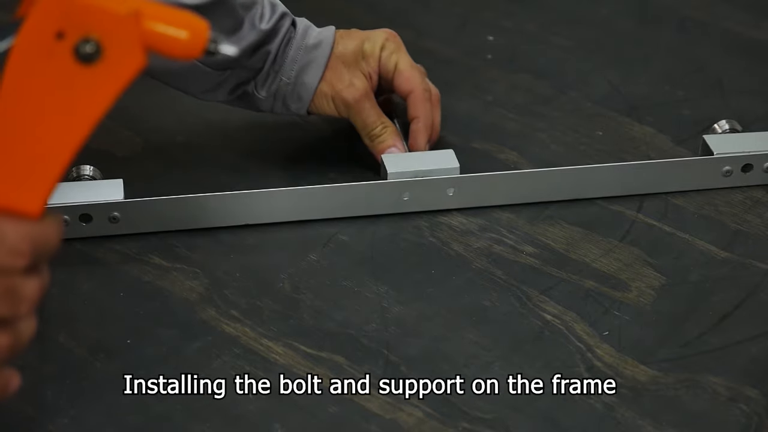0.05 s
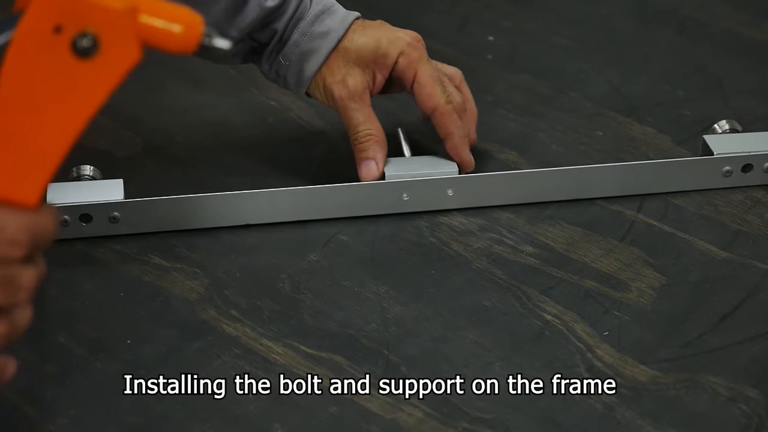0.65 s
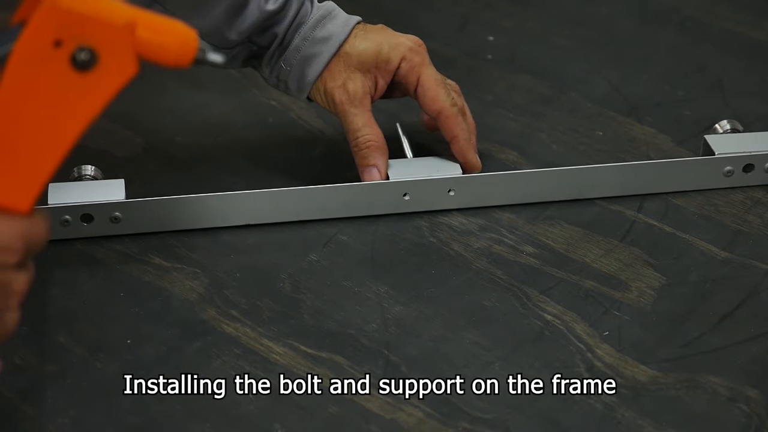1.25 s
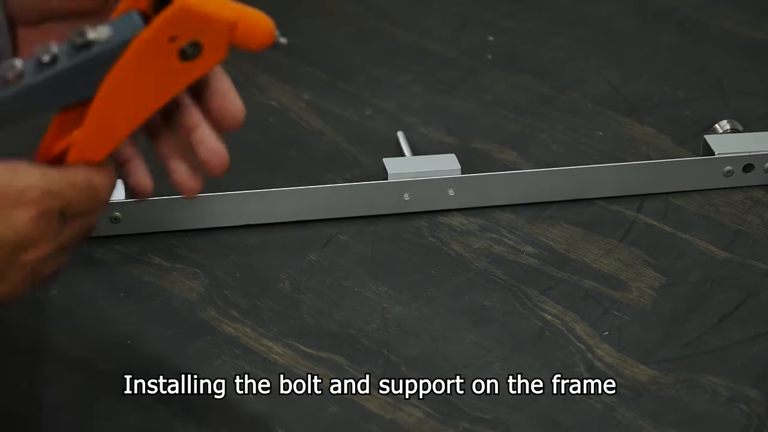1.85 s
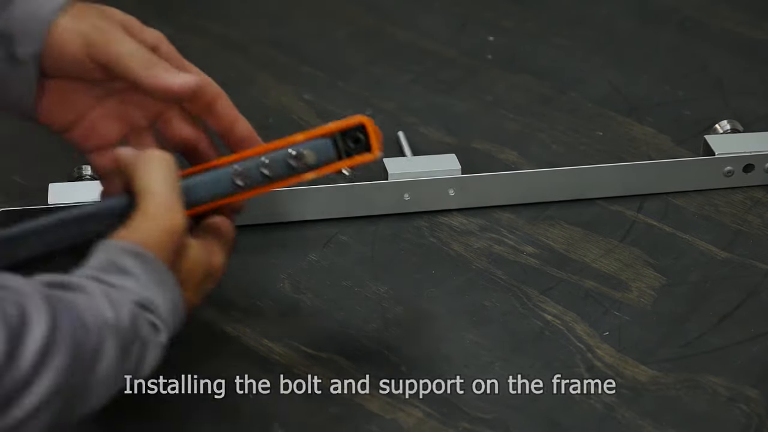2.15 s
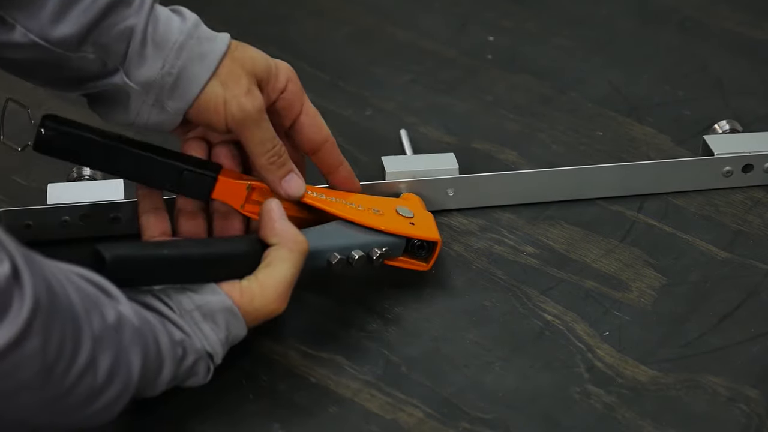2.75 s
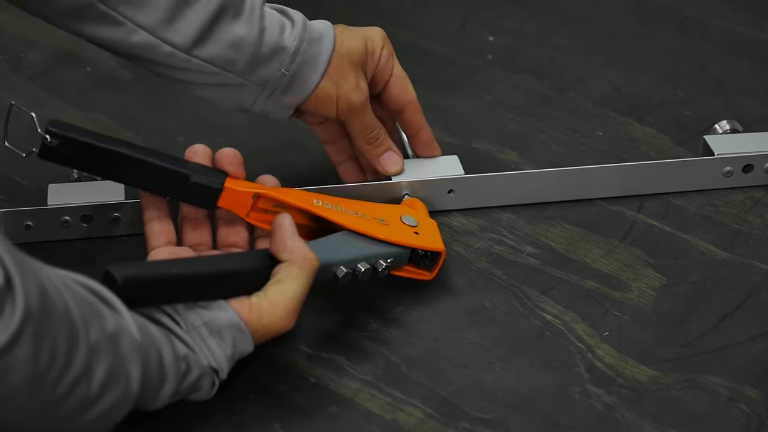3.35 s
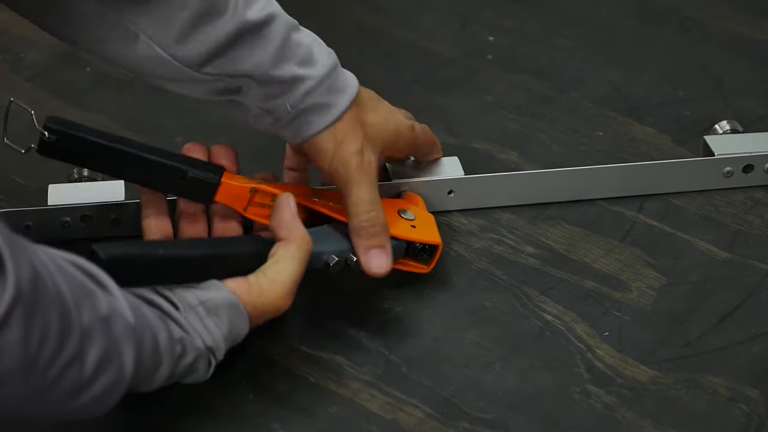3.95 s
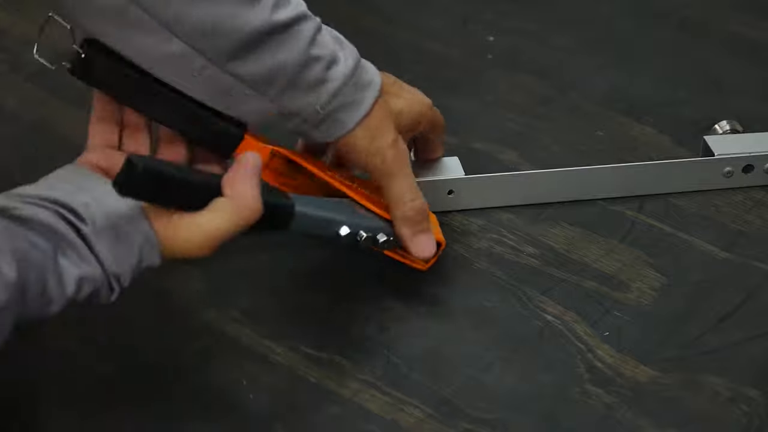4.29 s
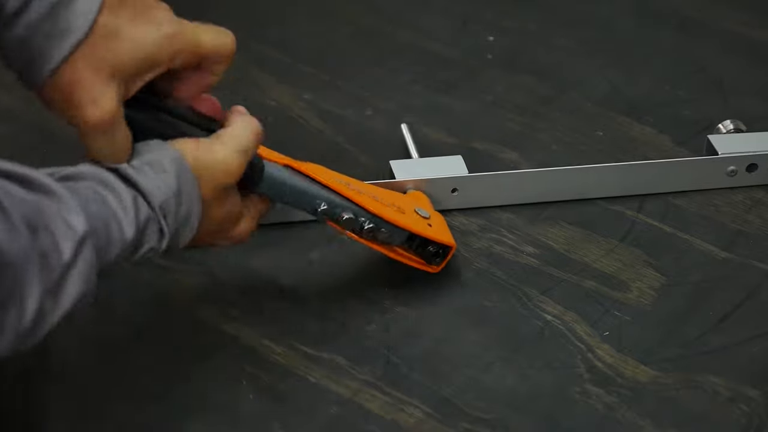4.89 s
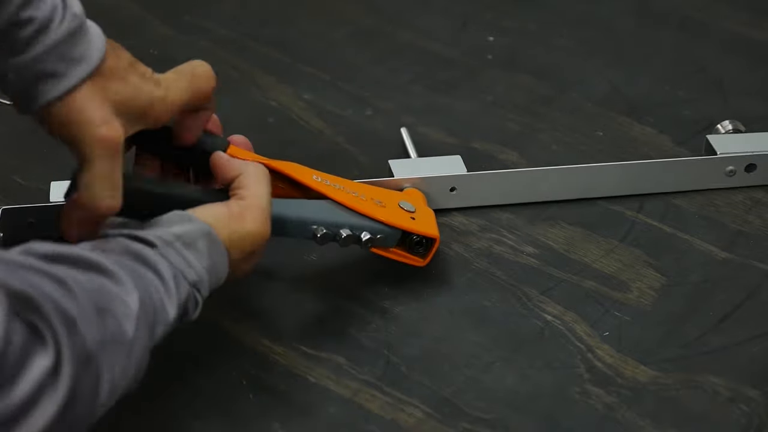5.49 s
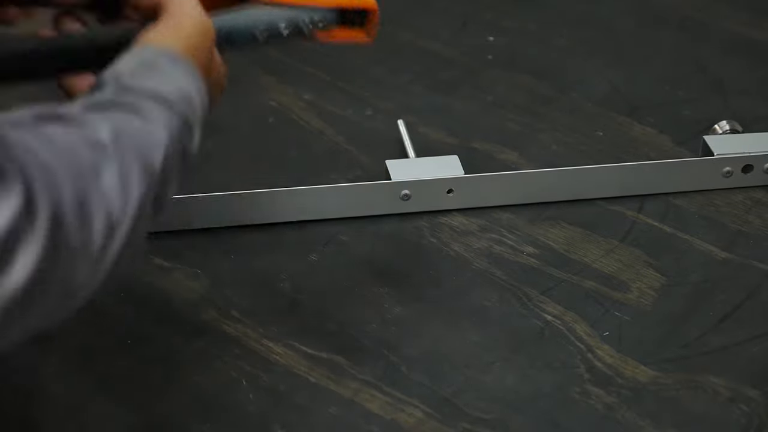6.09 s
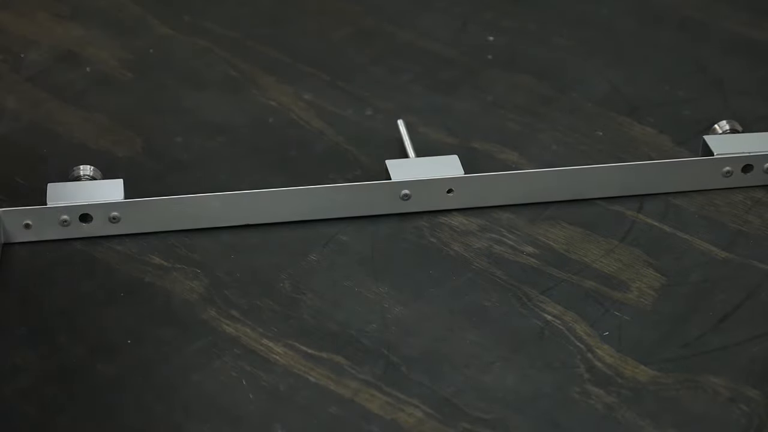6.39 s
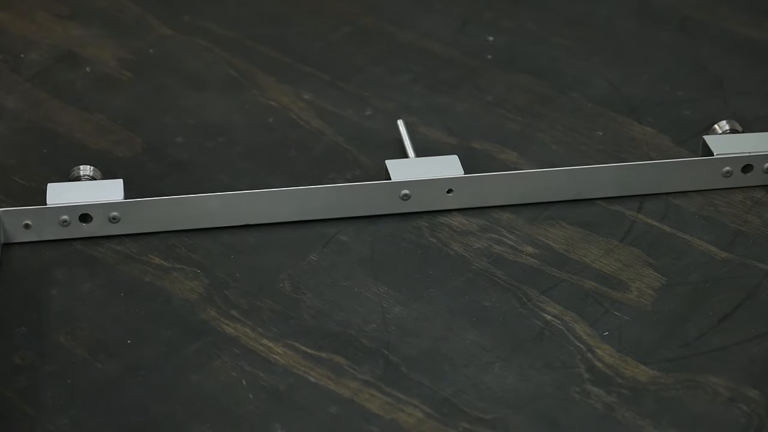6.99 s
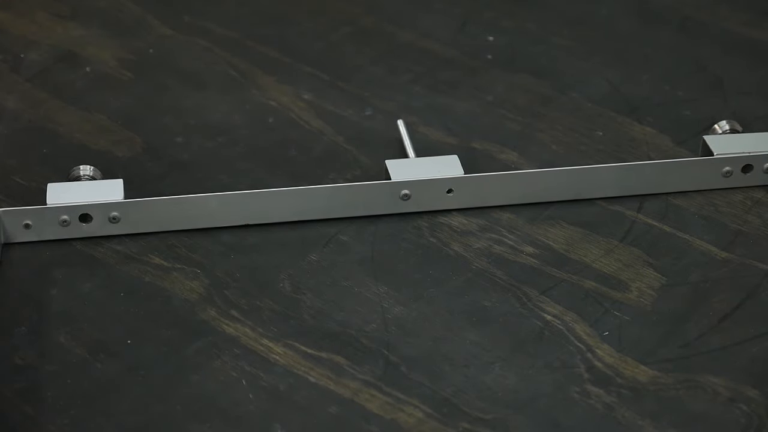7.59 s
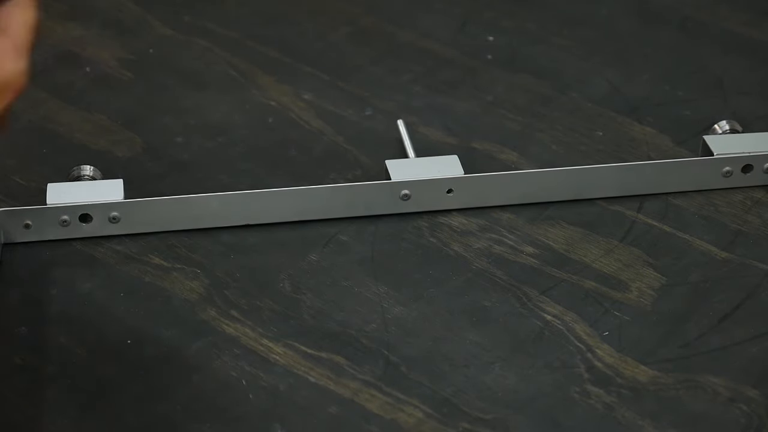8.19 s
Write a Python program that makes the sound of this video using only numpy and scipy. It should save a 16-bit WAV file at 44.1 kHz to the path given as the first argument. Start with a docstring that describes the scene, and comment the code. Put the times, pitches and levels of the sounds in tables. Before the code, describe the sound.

Faint, steady workshop air lies under close sounds of metal being handled. A rivet scrapes briefly and softly against a bracket on an aluminium bar at the start, then at about 0.6 and 1.4 seconds. From 2.6 to 3.8 seconds comes a run of light scrapes and ticks as a hand rivet tool is fitted over it. The tool knocks dully on the workbench at 4.1 seconds, gives two sharper clacks around 5.1 and small knocks near 5.5. At about 5.6 seconds the rivet stem snaps with one hard, bright metallic crack, by far the loudest sound. The bench and hall answer with a short ringing rumble that fades within a second. Small steel parts clink and rattle thinly from 6.2 to 6.9 seconds, strongest near 6.7, and one last light clink comes at around 8.1 seconds.

```python
"""A hand rivet tool is squeezed until the rivet's mandrel snaps with a hard metallic crack.
Leading up to it, the rivet scrapes through a bracket on an aluminium bar, and the tool is fitted over it
and knocks on the workbench. Bench and hall answer the snap with a swelling rumble, then small steel parts
rattle over a quiet room. Every contact is a burst of micro-impacts ringing the metal's resonances."""
import sys
import numpy as np
from scipy import signal
from scipy.fft import rfft, irfft, next_fast_len
from scipy.io import wavfile
from scipy.ndimage import uniform_filter1d, map_coordinates

SR = 44100
rng = np.random.default_rng(int(sys.argv[2]) if len(sys.argv) > 2 else 0)


def unload_audio(sound):
    """Save the sound as a 16-bit wav file, at the path given as the first command line argument."""
    columns = np.transpose(np.atleast_2d(sound))
    # keep every value between -1 and 1, then stretch to whole-number steps
    steps = np.round(np.clip(columns, -1, 1) * 32767)
    wavfile.write(sys.argv[1], SR, steps.astype(np.int16))


N = 363384

# Room tone and its dull wash. Each row: frequency in Hz, relative level in dB.
ROOM_SPECTRUM = [(15, -42), (25, -11), (58, -1.5), (87, -13), (164, -9.5), (237, -7.5), (286, -22.5),
                 (372, -21.5), (554, -17), (632, -16.5), (2440, -23), (2940, -29), (12900, -34.5),
                 (14000, -49.5)]
WASH_SPECTRUM = [(24, -63.5), (40, -36), (92, 6.5), (129, -12), (158, -6), (343, -7.5), (419, -7.5),
                 (458, -12), (817, -8.5), (3000, -27.5), (3900, -59), (6600, -120)]
# The fader ride on the wash. Each row: time in seconds, level in dB.
WASH_RIDE = [(0, -65.5), (1.1, -66), (1.9, -69.5), (3.0, -71.5), (3.899, -60), (4.4, -66.5), (5.3, -62),
             (6.8, -67), (7.302, -56.5), (7.8, -55.5), (8.24, -61)]

# Contact cues, each a dull thud through the bench plus a ring of metal. Each row: time in seconds,
# half length in seconds, thud in dB, ring in dB, brightness in dB per octave, hall tail in dB,
# favoured mode in Hz.
STEEL_RATTLES = [(4.28, 0.0023, -62, -60.0, 0, -31, 3300.0), (4.542, 0.0019, -71.0, -39, 3.0, -17.5, 3530),
                 (6.197, 0.0042, -59, -38, -13, -13, 2840), (6.5, 0.035, -69.5, -70, 17.5, -14, 8050),
                 (6.626, 0.015, -74, -51, 3, -10.5, 3380), (6.737, 0.013, -67, -22.5, 1.0, -3.5, 3600),
                 (6.82, 0.0071, -70.0, -27.5, -1.5, -4.5, 3730), (6.88, 0.011, -79.0, -35, -2.0, 0.5, 2970),
                 (6.914, 0.009, -58.5, -38, -3, -5, 4024), (7.92, 0.017, -57.5, -62, 2.0, -11.5, 4150),
                 (8.076, 0.017, -68, -36, 7.0, -13.5, 8300)]
BAR_SCRAPES = [(.018, 0.03, -58.5, -40, 1.5, -4, 1760), (.18, 0.031, -83, -54, 3.5, -4, 3350),
               (.624, .014, -50.5, -25.5, 2.5, -7.5, 540), (1.361, .014, -38, -46, -10.5, -8, 1040),
               (2.255, 0.011, -85, -59.5, -4, -15, 1770), (2.633, .015, -47.5, -36.5, -2, -5.5, 540),
               (2.762, .014, -45.5, -38.5, 1.5, -3, 335), (2.872, 0.016, -47.5, -43, 0.5, -6.5, 2900),
               (3.053, .011, -36, -40.5, -4.5, -6, 330), (3.09, .012, -60.5, -44, -1, -5, 4730),
               (3.177, .012, -43, -27.5, 2, -8, 3700), (3.472, .016, -50.5, -47.5, 0.5, -5, 332),
               (3.6, 0.014, -42, -32.5, -2.5, -11.5, 486), (3.76, .015, -44, -86, 0, -8, 342)]
TOOL_KNOCKS = [(4.099, 0.013, -22.5, -77, -1, -13.5, 415), (4.134, .01, -39, -59, -1.5, -22, 2240),
               (4.159, 0.0014, -44.5, -58, -7, -18, 183), (4.763, 0.0053, -56, -61, -2.5, -6.5, 3150),
               (4.802, 0.0025, -72, -62, -3, -17, 3200), (5.058, .008, -71, -67.5, -8.5, -2.5, 3220),
               (5.084, .0034, -27.5, -27.5, 2.5, -8.5, 643), (5.138, 0.0036, -54, -47, 2, -19, 4300),
               (5.148, 0.0035, -28, -46, 1.5, -8.5, 3360), (5.447, 0.0093, -32.5, -66, -7, -6.5, 2260),
               (5.539, 0.0027, -36.5, -67, -9.5, -6.5, 590)]
# The resonances of each metal part. Each row: frequency in Hz, width in Hz, lift in dB.
STEEL_MODES = [(3070, 120, 5.6), (3270, 82, 2.9), (3780, 90, 7), (4400, 150, 2.2), (4810, 96, 5.3),
               (5280, 64, 5.3), (6980, 380, 4.8), (8740, 2000, 5.6), (12040, 290, 11.5), (13100, 120, 2.1)]
BAR_MODES = [(230, 13, 10.5), (316, 64, 11), (568, 115, 10.5), (685, 23, 8.5), (1150, 110, 2),
             (1483, 230, 2.5), (1762, 360, 1), (2223, 170, 2.5), (3570, 180, 4), (4140, 200, 4),
             (4690, 137, 3.5), (5570, 600, 6.5), (6230, 340, 6.5), (7660, 800, 7.5)]
TOOL_MODES = [(316, 63, 9.2), (580, 150, 17), (1830, 140, 6.7), (2500, 120, 5.6), (3180, 140, 4.5),
              (4240, 96, 2.5)]
JAW_MODES = [(2250, 410, 8.9), (3290, 190, 10), (4600, 490, 6), (5800, 280, 2.3), (7150, 700, 11),
             (8450, 350, 9.2), (12200, 560, 7.3)]
# The edges in Hz of five EQ bands, then the body of the snap as a gain in dB for each band.
BAND_EDGES = [110, 400, 1200, 2500, 7000, 14000]
SNAP_EQ = [-39, -31.5, -28, -17.5, -29]
# Voicing for each kind of contact: ring colour per band, the thud's fall per octave, the favoured mode's
# lift and Q, the lift of the bands around it, and the hall tail's decay in seconds.
RATTLE_TONE = dict(ring_eq_db=[-43, -23, -13, 0, -13.5], thud_fall_db=8,
                   mode_db=7.5, mode_q=16, around_db=2.5, t60=0.87)
SCRAPE_TONE = dict(ring_eq_db=[-29.5, -9.5, -11.5, -0.5, -14.5], thud_fall_db=10,
                   mode_db=13, mode_q=13, around_db=2.5, t60=0.7)
KNOCK_TONE = dict(ring_eq_db=[-28, -4.5, -6, -1, -11], thud_fall_db=11.5,
                  mode_db=8.5, mode_q=5.9, around_db=9, t60=0.32)

# The rumble's colour. Each row: frequency in Hz, relative level in dB.
RUMBLE_SPECTRUM = [(40, -29.5), (85, -13.5), (130, -10.5), (225, -1.5), (300, -1), (420, -8.5), (510, -3.5),
                   (650, -7.5), (1700, -12), (2800, -13), (3100, -8.5), (3600, -17.5), (5200, -13),
                   (7000, -18.5), (12500, -34), (15000, -45)]
# How long the rumble hangs. Each row: frequency in Hz, 60 dB decay time in seconds.
RUMBLE_DECAY = [(80, 0.38), (220, 0.89), (600, 0.75), (1500, 0.68), (3500, 0.72), (7000, 0.56),
                (12000, 0.32)]
# Bench and bar ringing on inside the rumble. Each row: frequency in Hz, relative level in dB.
BENCH_TONES = [(167, -44), (211, -37), (233, -42), (281, -42), (354, -40.5), (489, -38.5), (565, -43),
               (683, -43.5), (1243, -47.5), (1362, -49), (2206, -49.5), (3010, -50.5), (3080, -53)]

SNAP_S = 5.6378  # the mandrel breaks


def amp(db):
    """Decibels to gain."""
    return 10 ** (np.asarray(db) / 20)


def unit(x):
    """x scaled to rms 1."""
    return x / np.sqrt(np.mean(x ** 2) + 1e-20)


def along(points, hz):
    """Read a curve of (Hz, value) points on a log frequency axis."""
    freqs, values = np.transpose(points)
    return np.interp(np.log(hz + 1), np.log(freqs + 1), values)


def placed(sound, start_s):
    """A full-length stereo track with the sound dropped in at start_s."""
    track = np.zeros((2, N))
    start = round(start_s * SR)
    part = sound[:, max(-start, 0):N - start]
    track[:, max(start, 0):][:, :part.shape[1]] += part
    return track


def filtered(x, gain):
    """EQ x with the curve gain(Hz)."""
    n = x.shape[-1]
    size = next_fast_len(n + SR // 4)
    return irfft(rfft(x, size) * gain(np.fft.rfftfreq(size, 1 / SR)), size)[..., :n]


def faded(x, envelope):
    """Fade each frequency of x along its own envelope(Hz, seconds)."""
    hz, t, frames = signal.stft(x, SR, nperseg=256)
    return signal.istft(frames * envelope(hz[:, None], t), SR, nperseg=256)[1][:, :x.shape[1]]


def ripple(hz, depth_db, spacing_hz):
    """Gain of many weak, closely spaced resonances."""
    knots = rng.standard_normal(4096)
    return amp(depth_db * map_coordinates(knots, [hz / spacing_hz], mode="wrap"))


def diffuse_noise(spectrum, n):
    """Wide stereo noise of rms 1, coloured by the room's many modes."""
    colour = lambda hz: amp(along(spectrum, hz)) * ripple(hz, depth_db=2, spacing_hz=24.88)
    return unit(filtered(rng.standard_normal((2, n)), colour))


def room_tone(air_db=-68):
    """The bed: steady workshop air, and a dull wash that slowly comes and goes."""
    wash_db = np.interp(np.arange(N) / SR, *np.transpose(WASH_RIDE))
    air = amp(air_db) * diffuse_noise(ROOM_SPECTRUM, N)
    return air + amp(wash_db) * diffuse_noise(WASH_SPECTRUM, N)


def chatter(n, correlation=0):
    """Grit: dense micro-impacts of uneven size, fully wide at correlation 0 and mono at 1."""
    mid, side = rng.standard_normal((2, n))
    roughness = unit(uniform_filter1d(rng.standard_normal(n), size=40))
    spread = np.arccos(correlation) / 2
    mid, side = np.cos(spread) * mid, np.sin(spread) * side
    return unit(amp(1.2 * roughness)) * np.array([mid + side, mid - side])


def resonate(force, modes, eq_db, low_hz, high_hz):
    """A white force rings an object's modes, shaped band by band and rolled off at both ends."""
    size = 2 * next_fast_len(force.shape[1] * 2 // 3)
    hz = np.fft.rfftfreq(size, 1 / SR)
    peaks = sum((amp(db) ** 2 - 1) / (1 + (2 * (hz - f) / width) ** 2) for f, width, db in modes)
    power = (1 + peaks) * ripple(hz, depth_db=3, spacing_hz=47.73) ** 2
    trims = []
    for low, high, db in zip(BAND_EDGES, BAND_EDGES[1:], eq_db):
        band_power = power[(hz > low) & (hz < high)].sum() / len(hz)
        trims.append((np.sqrt(low * high), db - 10 * np.log10(band_power)))
    rolloff = (1 + (low_hz / (hz + 1)) ** 6) * (1 + (hz / high_hz) ** 8)
    gain = amp(along(trims, hz)) * np.sqrt(power / rolloff)
    # minimum phase: the ringing follows the force
    cepstrum = irfft(np.log(gain + 1e-9))
    cepstrum[1:size // 2] *= 2
    cepstrum[size // 2 + 1:] = 0
    return irfft(rfft(force, size) * np.exp(rfft(cepstrum)), size)[:, :force.shape[1]]


def contact_eq(thud_db, ring_db, bright_db, mode_hz, tone, pivot_hz=4050, tilt_from_hz=1120):
    """Band gains in dB: a bassy thud, a ring tilted by brightness, a bump around the favoured mode."""
    hz = np.sqrt(np.multiply(BAND_EDGES[:-1], BAND_EDGES[1:]))
    thud = amp(thud_db - tone["thud_fall_db"] * np.log2(hz / hz[0]))
    tilt_db = bright_db * np.log2(np.maximum(hz, tilt_from_hz) / pivot_hz)
    ring = amp(ring_db + tilt_db + tone["ring_eq_db"])
    bump_db = tone["around_db"] * np.exp(-np.log2(hz / mode_hz) ** 2)
    return 20 * np.log10(np.hypot(thud, ring)) + bump_db


def contacts(cues, tone, modes, damping_hz, low_hz, high_hz, lead_s=0.08, full_slide_s=0.0067):
    """Each contact swells and fades as the surfaces slide, then dies away in the hall, treble first."""
    out = np.zeros((2, N))
    t = np.arange(SR) / SR - lead_s
    for at_s, half_s, thud_db, ring_db, bright_db, tail_db, mode_hz in cues:
        bite = (1 + np.tanh(2 * (t / half_s + np.sqrt(2)))) / 2  # the surfaces meet
        slide = chatter(SR) * bite * np.exp(-0.5 * (t / half_s) ** 2)
        t60 = tone["t60"] * min(half_s / full_slide_s, 1)  # quick taps die sooner
        decay = lambda hz, s: amp(-60 * np.maximum(s - lead_s, 0) / t60 * np.hypot(1, hz / damping_hz))
        tail = faded(rng.standard_normal((2, SR)), decay) * bite * (1 + np.tanh(t / half_s)) / 2
        favoured = (mode_hz, mode_hz / tone["mode_q"], tone["mode_db"])  # set by the point of contact
        eq_db = contact_eq(thud_db, ring_db, bright_db, mode_hz, tone)
        hit = resonate(slide + amp(tail_db) * tail, [*modes, favoured], eq_db, low_hz, high_hz)
        out += placed(hit, at_s - lead_s)
    return out


def steel_rattles():
    """Jaws, spring and loose mandrel clink with a thin, bright ring."""
    return contacts(STEEL_RATTLES, RATTLE_TONE, STEEL_MODES, damping_hz=8500, low_hz=110, high_hz=11000)


def bar_scrapes():
    """Rivet, bracket and tool nose slide against the aluminium bar and set it ringing."""
    return contacts(BAR_SCRAPES, SCRAPE_TONE, BAR_MODES, damping_hz=8500, low_hz=125, high_hz=10200)


def tool_knocks():
    """The tool bumps the bench and its handles take up their play."""
    return contacts(TOOL_KNOCKS, KNOCK_TONE, TOOL_MODES, damping_hz=9000, low_hz=155, high_hz=12000)


def hall_rumble(echo_db=-25.5, bench_trim_db=0.5, build=2.17, predelay_s=0.004):
    """After the snap, echoes pile up and fade while bench and bar ring on; low mids hang longest."""
    t = np.arange(3 * SR // 2) / SR

    def swell(hz, s):
        crest_s = build * along(RUMBLE_DECAY, hz) / np.log(1000)
        return (s / crest_s * np.exp(1 - s / crest_s)) ** build

    rumble = amp(echo_db) * faded(diffuse_noise(RUMBLE_SPECTRUM, len(t)), swell)
    for hz, db in BENCH_TONES:
        # close pairs of modes make the phase drift
        drift = np.array([map_coordinates(rng.standard_normal(40), [t * 9]) for _ in range(2)])
        phase = 2 * np.pi * (hz * t + rng.random((2, 1))) + 0.59 * drift
        rumble += amp(db + bench_trim_db) * unit(np.sin(phase)) * swell(hz, t)
    return placed(rumble, SNAP_S + predelay_s)


def mandrel_snap(slip_db=-14, slip_s=0.01, crack_db=4, crack_t60=0.035,
                 recoil_s=0.026, recoil_t60=0.3, tail_db=-17, tail_t60=0.51):
    """The jaws slip, the mandrel cracks apart, and the tool recoils, chattering till the handles close."""
    t = np.arange(SR // 2) / SR
    slip_n = round(slip_s * SR)
    slip = amp(slip_db) * np.linspace(0, 1, slip_n) ** 2 * chatter(slip_n, correlation=0.3)
    crack = amp(crack_db - 60 * t / crack_t60) * chatter(len(t), correlation=0.75)
    choke = 1 / np.sqrt(1 + (t / recoil_s) ** 12)  # the handles close
    recoil = amp(-60 * t / recoil_t60) * choke * chatter(len(t), correlation=0.3)
    tail = amp(tail_db - 60 * t / tail_t60) * rng.standard_normal((2, len(t)))
    force = np.hstack([slip, crack + recoil + tail])
    return placed(resonate(force, JAW_MODES, SNAP_EQ, low_hz=110, high_hz=13700), SNAP_S - slip_s)


def scene():
    """The mix: room tone underneath, the handling of the parts, then the rumble and the snap on top."""
    return room_tone() + steel_rattles() + bar_scrapes() + tool_knocks() + hall_rumble() + mandrel_snap()


def record(dry, ceiling=0.47, top_hz=15300):
    """A soft clip rounds the loudest peaks, and a steep low-pass takes off the very top."""
    rounded = dry / (1 + np.abs(dry / ceiling) ** 4) ** (1 / 4)
    return filtered(rounded, lambda hz: 1 / np.sqrt(1 + (hz / top_hz) ** 120))


dry = scene()
out = record(dry)
unload_audio(out)
```